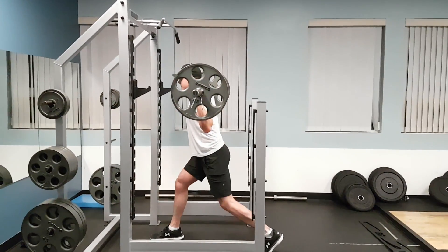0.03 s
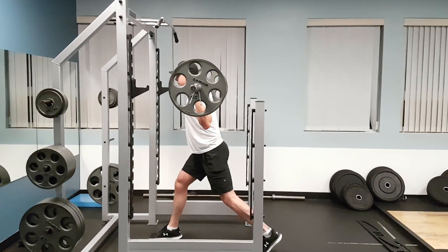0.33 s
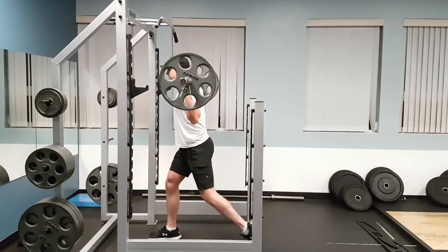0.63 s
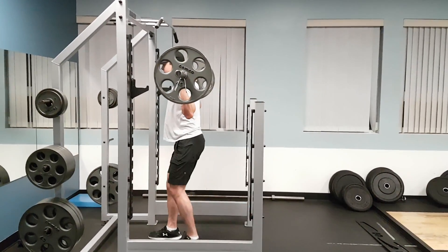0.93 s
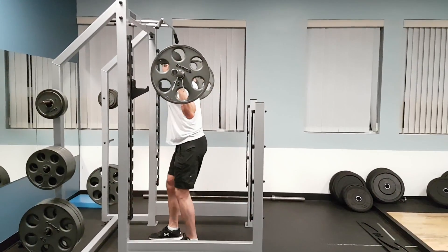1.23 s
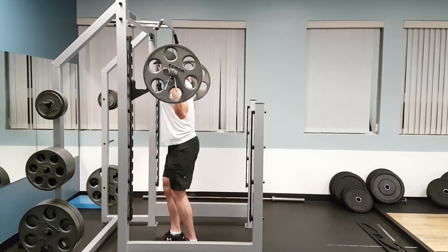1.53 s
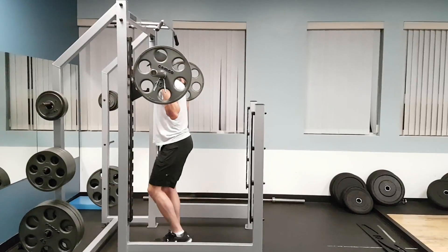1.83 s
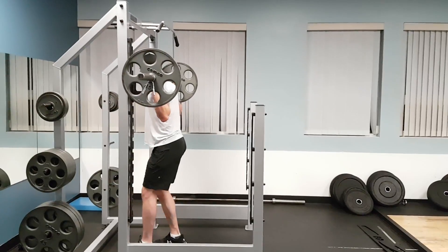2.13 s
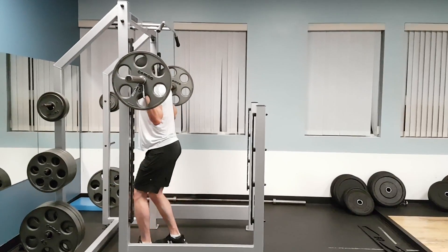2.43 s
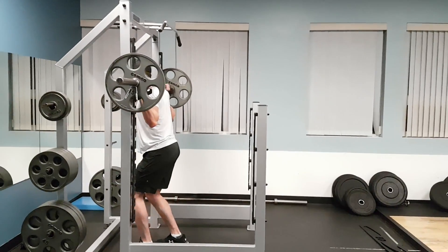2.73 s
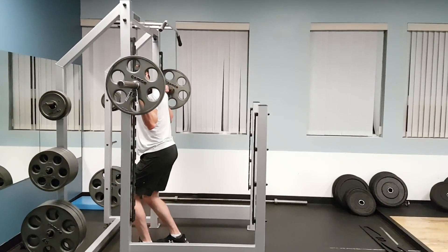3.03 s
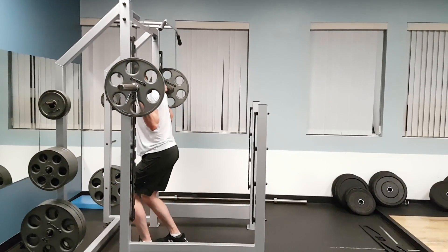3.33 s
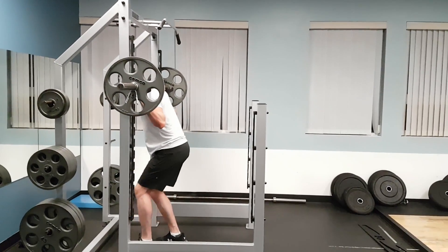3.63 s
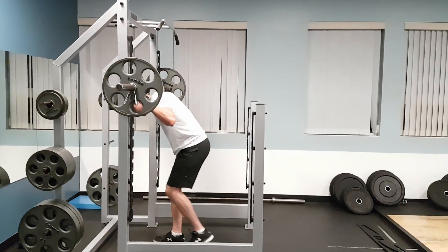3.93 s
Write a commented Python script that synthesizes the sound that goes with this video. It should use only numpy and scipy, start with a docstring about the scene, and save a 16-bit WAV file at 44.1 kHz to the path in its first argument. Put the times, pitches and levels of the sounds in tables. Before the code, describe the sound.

Soft footsteps and plate clinks, then a barbell lands in a rack with two ringing clangs.

```python
"""Racking a loaded barbell

A lifter steps up to a steel rack in a hard-walled gym. Over the ventilation, clothes rustle, shoes
scuff, sleeves squeak and loose plates clink. The bar strikes one upright, then the other: the tubes
clang, the iron plates rattle and ring on, the frame booms, and the bar rolls home in its hook."""
import sys
import numpy as np
from scipy import signal
from scipy.fft import rfft, irfft
from scipy.io import wavfile
from scipy.ndimage import uniform_filter1d

SR = 44100
rng = np.random.default_rng(int(sys.argv[2]) if len(sys.argv) > 2 else 0)


def file_out(sig):
    """Save sig as 16-bit WAV at sys.argv[1]."""
    # one column per channel
    cols = np.atleast_2d(sig).T
    # limit, then scale
    lim = np.clip(cols, -1, 1)
    pcm = np.round(lim * 32767).astype(np.int16)
    wavfile.write(sys.argv[1], SR, pcm)


N = 176400
T = np.arange(N) / SR


def amp(db):
    """Decibels to gain."""
    return 10 ** (np.asarray(db) / 20)


def unit_rms(x):
    """Scales to an rms of one."""
    return x / np.sqrt(np.mean(abs(x) ** 2) + 1e-20)


def curve_at(points, hz):
    """Reads a curve on a log-frequency axis."""
    f, value = np.transpose(points)
    return np.interp(np.log(hz + 1), np.log(f + 1), value)


def add(mix, start, sound, rise):
    """Mixes in a sound at its start time, fading it in over rise seconds."""
    part = mix[:, round(start * SR):][:, :sound.shape[1]]
    count = part.shape[1]
    part += sound[:, :count] * np.minimum(T[:count] / max(rise, 1e-4), 1)


def pan_gains(pan, hz):
    """Constant-power stereo gains; pan is always left minus right, in dB."""
    gains = amp(np.array([curve_at(pan, hz), -curve_at(pan, hz)]) / 2)
    return gains / np.sqrt((gains ** 2).mean(0))


# how alike left and right are in the room: f/Hz, correlation
COHERENCE = [(100, .985), (250, .92), (500, .58), (1000, .08), (4000, 0), (15000, .1)]
def noise(colour, pan, size):
    """Coloured stereo noise at unit rms, narrow in the bass and wide above."""
    hz = np.fft.rfftfreq(size, 1 / SR)
    a, b = rfft(rng.standard_normal((2, size)))
    alike = np.clip(curve_at(COHERENCE, hz), -1, 1)
    spectrum = np.array([a, alike * a + np.sqrt(1 - alike ** 2) * b])
    return unit_rms(irfft(spectrum * amp(curve_at(colour, hz)) * pan_gains(pan, hz), size))


def tail(colour, t60, pan, bass_rise=1e-4):
    """A wash of overlapping modes and echoes, each band dying at its own speed."""
    hz, t, bands = signal.stft(noise(colour, pan, size=49152), SR, nperseg=512)
    quickness = 1 + (hz[:, None] / 600) ** 3  # bands above 600 Hz build up much sooner
    swell = 1 - np.exp(-(t + .002) * quickness / bass_rise)
    decay = amp(-60 * t / np.maximum(curve_at(t60, hz), .02)[:, None])
    return signal.istft(bands * swell * decay, SR, nperseg=512)[1]


WAVER_DEPTH, WAVER_HZ = 0.57, 9.2
def ring(modes, t60, size):
    """Dying modes at relative levels; echoes make each waver differently left and right."""
    t, out = T[:size], np.zeros((2, size))
    knots = np.arange(64) / WAVER_HZ
    levels = amp([mode[1] for mode in modes])
    for (hz, _, pan_db), level in zip(modes, levels / np.linalg.norm(levels)):
        alike = np.clip(curve_at(COHERENCE, hz), -1, 1)
        a, b = rng.standard_normal((2, len(knots))) + 1j * rng.standard_normal((2, len(knots)))
        right_phase = np.exp(1j * np.arccos(alike) * rng.choice([-1, 1]))
        left = 1 + WAVER_DEPTH * a
        right = right_phase + WAVER_DEPTH * (alike * a + np.sqrt(1 - alike ** 2) * b)
        tone = np.exp(2j * np.pi * (hz * t + rng.random()) - np.log(1000) * t / t60(hz))
        gains = unit_rms(amp([[pan_db / 2], [-pan_db / 2]]))
        out += level * gains * np.array([(np.interp(t, knots, p) * tone).real for p in (left, right)])
    return out * np.sqrt(2 / (1 + 2 * WAVER_DEPTH ** 2))


def struck(hits, modes, t60, rise):
    """A part that rings with the same modes at every hit."""
    out = np.zeros((2, N))
    for start, db in hits:
        size = min(round(t60 * SR), N - round(start * SR))
        add(out, start, amp(db) * ring(modes, lambda hz: t60, size), rise)
    return out


def metallic(colour):
    """Breaks a smooth spectrum into narrow peaks and dips: the many weak modes of a metal part."""
    hz = np.concatenate([np.arange(20, 4200, 13), np.arange(4200, 16000, 95)])
    depth_db = np.sqrt(3) * np.interp(hz, [0, 500, 4000, 4500], [0, 3.1, 3.1, 5.2])
    return np.transpose([hz, curve_at(colour, hz) + depth_db * rng.uniform(-0.58, 1, len(hz))])


# the gym's reverb time: f/Hz, t60/s
ROOM_T60 = [(100, 0.46), (1000, 1), (4000, 0.89), (8000, 0.94), (11000, 0.37), (15000, 0.3)]
EARLY_DB, EARLY_DECAY_S = 4, 0.02
def contact(colour, pan):
    """A noise hit with strong early reflections and a room tail."""
    wash = tail(colour, ROOM_T60, pan)
    early = amp(EARLY_DB) * np.exp(-T[:wash.shape[1]] / EARLY_DECAY_S)
    return wash * (1 + early) / 2


# colour of the vent rumble and hiss: f/Hz, relative density/dB
AIR_COLOUR = [(20, -11.5), (30, -9), (45, -27.5), (68, 0), (95, -12.5), (125, -5.5), (180, -13.5),
              (260, -14), (400, -14), (550, -23), (700, -19), (1000, -25), (1400, -27.5), (2800, -34),
              (5000, -43.5), (9500, -49.5), (12500, -44), (15500, -41.5)]
# motor hum partials: f/Hz, level/dB
HUM = [(119.5, -59), (240, -66), (682, -76.5)]
# the room's stereo lean: f/Hz, pan/dB
ROOM_PAN = [(60, -3), (240, -1.5), (950, 1), (3770, 1.9), (15000, 0)]
def ventilation():
    """The bed: steady air noise with a motor hum."""
    hum = sum(amp(db) * np.sqrt(2) * np.sin(2 * np.pi * (hz * T + rng.random())) for hz, db in HUM)
    return amp(-55) * noise(AIR_COLOUR, ROOM_PAN, size=N) + hum


# cloth swells: peak t/s, width/s, level/dB
RUSTLES = [(.9, 0.15, -65), (1.55, 0.76, -64.5)]
# soft cloth colour: f/Hz, relative density/dB
CLOTH_COLOUR = [(300, 1), (1200, 1), (2600, -2.5), (4500, -15), (8000, -20.5), (15000, -32)]
def rustle():
    """Clothes rub in soft swells as the lifter moves."""
    swell = sum(amp(db) * np.exp(-((T - peak) / width) ** 2) for peak, width, db in RUSTLES)
    return swell * noise(CLOTH_COLOUR, ROOM_PAN, size=N)


# footfalls: t/s, thud level/dB, scuff level/dB, rise/s
FOOTFALLS = [(0.879, -53, -74, 0.0034), (1.14, -40.5, -59.5, 0.0058), (1.277, -46, -85, 0.0013),
             (1.43, -51, -82, 0.011), (1.595, -54, -73, 0.0047), (1.997, -53.5, -75, 0.0039),
             (2.24, -47.5, -68, 0.018)]
# dull shoe thud: f/Hz, relative density/dB
THUD_COLOUR = [(50, 4.5), (150, 5), (350, -2), (900, -0.5), (1600, -12.5), (3000, -17.5), (5000, -35),
               (15000, -48)]
# bright edge of a scuff, also of steel on steel: f/Hz, relative density/dB
BRIGHT_COLOUR = [(200, -20), (2000, -14.5), (5000, 2.5), (7500, -4), (8700, -4), (9400, -24), (11000, -8.5),
                 (14000, -14.5), (15700, -26)]
def footsteps():
    """Shoes land and scuff on the rubber floor."""
    out = np.zeros((2, N))
    for start, thud_db, scuff_db, rise in FOOTFALLS:
        thud = amp(thud_db) * tail(THUD_COLOUR, ROOM_T60, ROOM_PAN)
        scuff = amp(scuff_db) * contact(BRIGHT_COLOUR, ROOM_PAN)
        add(out, start, thud + scuff, rise)
    return out


# near plate clinks: t/s, level/dB
NEAR_CLINKS = [(1.277, -38), (1.41, -45)]
# near plate modes: f/Hz, level/dB, pan/dB
NEAR_MODES = [(675, -5, 0), (938, -11, -3), (1328, -4, 0), (1351, -1, -2), (1382, -4, 2), (2711, -21, 5),
              (2767, -16, 1)]
# bursts of plate chatter: t/s, level/dB, rise/s
CHATTERS = [(.886, -56, .003), (1.277, -51, 0.0018), (2.0, -49.5, 0.014)]
# mid-heavy chatter colour: f/Hz, relative density/dB
CHATTER_COLOUR = [(200, -23), (680, 4.5), (1100, 5), (1400, 2.5), (1900, -3), (2600, -5.5), (3350, -5),
                  (4200, -26), (8000, -37), (15000, -50)]
# far plate clinks: t/s, level/dB
FAR_CLINKS = [(.886, -55.5), (1.999, -50.5), (2.07, -55)]
# far plate modes: f/Hz, level/dB, pan/dB
FAR_MODES = [(687, -9, 5), (909, 0, -4), (925, -2, 0), (960, -2, 2), (1370, -3, 2)]
def loose_plates():
    """Plates knock on the sleeves: short clinks and dull chatter that linger in the room."""
    out = struck(NEAR_CLINKS, NEAR_MODES, t60=0.19, rise=0.003)
    out += amp(-16) * struck(NEAR_CLINKS, NEAR_MODES, t60=1.76, rise=0.033)  # room tail
    for start, db, rise in CHATTERS:
        add(out, start, amp(db) * contact(metallic(CHATTER_COLOUR), ROOM_PAN), rise)
    return out + struck(FAR_CLINKS, FAR_MODES, t60=0.48, rise=0.0019)


# sleeve squeaks: t/s, length/s, starting f/Hz, level/dB
SQUEAKS = [(1.277, 0.048, 1388, -47.5), (1.281, .18, 2800, -65.5), (1.38, 0.092, 4050, -65.5),
           (1.514, 0.074, 4040, -64), (2.219, 0.045, 4020, -68), (2.482, 0.07, 4030, -74.5)]
PITCH_SAG, PITCH_JITTER, ROUGHNESS, SQUEAK_REVERB_DB = .022, .011, .7, 1
def sleeve_squeaks():
    """A turning sleeve sticks and slips: a rough tone that sags in pitch and lingers in the room."""
    out = np.zeros((2, N))
    for start, length, hz, db in SQUEAKS:
        progress = np.linspace(0, 1, round(length * SR))
        wobble = unit_rms(uniform_filter1d(rng.standard_normal((2, SR)), size=160))
        jitter, grip = wobble[:, :len(progress)]
        pitch = hz * (1 - PITCH_SAG * progress + PITCH_JITTER * jitter)
        envelope = np.sqrt(abs(np.sin(np.pi * progress))) * (1 + ROUGHNESS * grip)
        tone = envelope * np.sin(2 * np.pi * np.cumsum(pitch) / SR)
        room = rng.standard_normal((2, SR)) * amp(-60 * T[:SR] / curve_at(ROOM_T60, hz))
        room *= amp(SQUEAK_REVERB_DB) / np.linalg.norm(room[0])
        room[:, 0] += 1  # direct sound
        squeak = signal.fftconvolve(room, tone[None], axes=1)
        add(out, start, amp(db) * pan_gains(ROOM_PAN, np.array([hz])) * squeak, rise=0)
    return out


# the bar's last roll: t/s, level/dB
ROLLS = [(3.872, -29.5)]
# modes of the roll: f/Hz, level/dB, pan/dB
ROLL_MODES = [(791, -11, 1), (1087, -7, 8), (1449, 0, -1)]
def bar_roll():
    """The bar rolls home in the hook with a last ring."""
    return struck(ROLLS, ROLL_MODES, t60=0.95, rise=0.013)


# plate knocks as the bar lands: t/s, level/dB
PLATE_KNOCKS = [(2.99, -29.5), (3.43, -26), (3.67, -28.5)]
# low modes of the plates: f/Hz, level/dB, pan/dB
PLATE_MODES = [(427, -47, 0), (589, -42, 6), (612, -43.5, 6), (629, -39, 0), (763, -40, 2), (788, -41.5, 1)]
def plate_ring():
    """Iron plates rock on the sleeves and ring on."""
    return struck(PLATE_KNOCKS, PLATE_MODES, t60=2.16, rise=0.046)


# shoves on the frame: t/s, level/dB
SHOVES = [(3.215, -23.5), (3.37, -22), (3.47, -30.5), (3.66, -30)]
# bass modes of the frame: f/Hz, level/dB, pan/dB
FRAME_MODES = [(63, -16, -2), (84, -17, -1), (112, 0, -1), (131, -9, 0), (157, -9, 0), (268, -10.5, 0)]
def frame_boom():
    """The low end: each shove sets the whole rack booming."""
    return struck(SHOVES, FRAME_MODES, t60=0.79, rise=0.064)


# skids on the first hook: t/s, level/dB
FIRST_SKIDS = [(2.982, -35.5)]
# its high modes: f/Hz, level/dB, pan/dB
FIRST_HOOK_MODES = [(5055, 0, 0), (5443, -3, -7), (5986, -4, 0), (7413, -1, 11), (7590, -4, 8)]
# skids on the second hook: t/s, level/dB
SECOND_SKIDS = [(3.367, -44), (3.652, -48), (3.70, -53.5)]
# its high modes: f/Hz, level/dB, pan/dB
SECOND_HOOK_MODES = [(4312, -1, 0), (6800, -2, 2), (7251, -3, 4), (7400, -4, 5), (7540, -5, 5)]
# the bar's hardest bite into the second hook: f/Hz, relative density/dB
BITE_COLOUR = [(700, -25), (1800, 0), (3000, -2), (4500, -30), (9000, -75)]
# short knocks that briefly ring the upright tube: t/s, level/dB
SLAPS = [(2.9535, -18), (3.09, -17.5), (3.40, -25)]
# short-lived modes of the tube: f/Hz, level/dB, pan/dB
SLAP_MODES = [(1389, -6, 0), (1497, 0, 0), (1532, -6, 1)]
SKID_T60_S, SLAP_T60_S, BITE_AT_S, BITE_DB = .62, 0.33, 3.411, -18
def hooks():
    """The hooks take the bar with a hard bite and ring high as its knurl skids, while short knocks briefly ring
    the tube."""
    out = struck(FIRST_SKIDS, FIRST_HOOK_MODES, SKID_T60_S, rise=0.0027)
    out += struck(SECOND_SKIDS, SECOND_HOOK_MODES, SKID_T60_S, rise=0.008)
    bite = tail(metallic(BITE_COLOUR), [(0, SLAP_T60_S)], SECOND_PAN)
    add(out, BITE_AT_S, amp(BITE_DB) * bite, rise=0.0018)
    return out + struck(SLAPS, SLAP_MODES, SLAP_T60_S, rise=0.01)


# ring time of the steel in the room: f/Hz, t60/s
STEEL_T60 = [(100, 4.3), (600, 3.07), (1400, 3), (2200, 2.23), (3200, 1.34), (5000, 1.25), (12000, 0.74)]
MODE_T60_RATIO, SETTLE_AT_S, SETTLE_DB_PER_S = 0.76, 3.65, 21
def clang(blows, modes, wash_colour, pan, modes_db):
    """The bar strikes a steel tube and rattles against it until its weight damps the ring."""
    out, body = np.zeros((2, N)), metallic(wash_colour)
    for start, ring_db, crash_db, rise in blows:
        tones = ring(modes, lambda hz: MODE_T60_RATIO * curve_at(STEEL_T60, hz), N - round(start * SR))
        add(out, start, amp(ring_db + modes_db) * tones, rise)
        wash = amp(ring_db) * tail(body, STEEL_T60, pan, bass_rise=0.025)
        crash = amp(crash_db) * contact(metallic(BRIGHT_COLOUR), pan)
        add(out, start, wash + crash, rise)
    return out * amp(-SETTLE_DB_PER_S * np.maximum(T - SETTLE_AT_S, 0))


# blows on the first upright: t/s, ring level/dB, crash level/dB, rise/s
FIRST_BLOWS = [(2.9535, -19.5, -58, 0.0048), (2.982, -17, -30.5, 0.0045), (3.085, -25, -58, 0.0082),
               (3.187, -53, -52, 0.004)]
# its strongest modes with the bar on it: f/Hz, level/dB, pan/dB
FIRST_MODES = [(1010, -41, 1), (1464, -33.5, -1), (1505, -31.5, 1), (1758, -38, 4), (1861, -35, -2),
               (1921, -35, 4), (1948, -33, 3), (2052, -39, 0), (2269, -36, 9), (2318, -36, 6),
               (2567, -34, 10), (2861, -35, 6), (2881, -31, 5), (2983, -34, 8), (3112, -37, 9),
               (3324, -37, 8), (3515, -36, 8)]
# its wash of weaker modes: f/Hz, relative density/dB
FIRST_WASH = [(40, -18.5), (120, -7), (300, -15), (600, -10.5), (1000, -5), (1800, 0.5), (2900, 1),
              (3600, 0), (4500, -16.5), (8500, -35.5), (9400, -43), (15000, -49)]
# its stereo placement: f/Hz, pan/dB
FIRST_PAN = [(60, -1), (130, -1), (290, -0.5), (640, -1), (1410, 1.5), (3100, 4), (6820, 0), (15000, 10)]
def first_upright():
    """One end of the bar lands and sets its tube clanging."""
    return clang(FIRST_BLOWS, FIRST_MODES, FIRST_WASH, FIRST_PAN, modes_db=-1.5)


# blows on the second upright: t/s, ring level/dB, crash level/dB, rise/s
SECOND_BLOWS = [(3.367, -13, -32.5, 0.0087), (3.411, -16, -48, 0.0026), (3.525, -29, -45, 0.029),
                (3.652, -21, -39, 0.027)]
# its strongest modes with the bar on it: f/Hz, level/dB, pan/dB
SECOND_MODES = [(1096, -40, -1), (1156, -38, -2), (1464, -36, 1), (1508, -36, 0), (1676, -36, 2),
                (1722, -35, 1), (1760, -37, -2), (1863, -37, 0), (1907, -35, 2), (1947, -36, 8),
                (2049, -36, 1), (2072, -36, 5), (2252, -35, 1), (2270, -34, 0), (2312, -34, 1),
                (2392, -33, 3), (2444, -37, 3), (2717, -33, 4), (2744, -34, 2), (2885, -38, 1),
                (3098, -34, 7), (3329, -39, 6)]
# its wash of weaker modes: f/Hz, relative density/dB
SECOND_WASH = [(40, -20.5), (120, -10.5), (300, -20.5), (600, -12.5), (1000, -6.5), (1800, -3.5),
               (2400, 0.5), (3100, -2), (3800, -8), (4700, -26), (8500, -38.5), (9400, -45.5), (15000, -59)]
# its stereo placement: f/Hz, pan/dB
SECOND_PAN = [(60, -0.5), (130, -0.5), (290, 1), (640, -2), (1410, 2.5), (3100, 3.5), (6820, -1),
              (15000, 12)]
def second_upright():
    """The other end lands with a louder, noisier clang."""
    return clang(SECOND_BLOWS, SECOND_MODES, SECOND_WASH, SECOND_PAN, modes_db=-4.5)


def scene():
    """The walk to the rack, then the two clangs."""
    rack = first_upright() + second_upright() + plate_ring() + frame_boom() + bar_roll()
    bed = ventilation()
    walk = rustle() + footsteps() + loose_plates() + sleeve_squeaks()
    return bed + walk + rack + hooks()


CEILING, LOWPASS_HZ = .92, 15730
def record(dry):
    """A soft clip rounds off the highest peaks, then a steep low-pass trims the top."""
    clipped = dry / (1 + (dry / CEILING) ** 8) ** (1 / 8)
    lowpass = signal.firwin(511, LOWPASS_HZ, window=("kaiser", 9), fs=SR)
    return signal.oaconvolve(clipped, lowpass[None], "same")


dry = scene()
out = record(dry)
file_out(out)
```